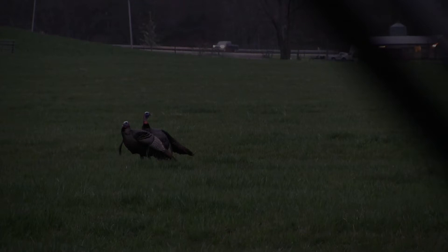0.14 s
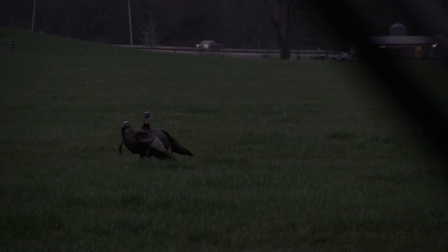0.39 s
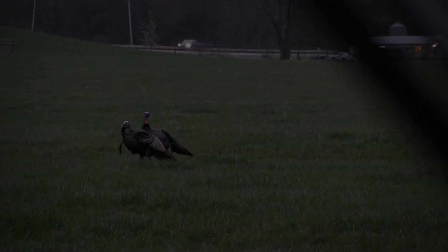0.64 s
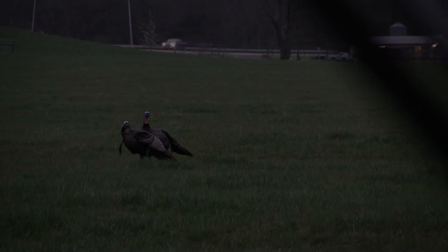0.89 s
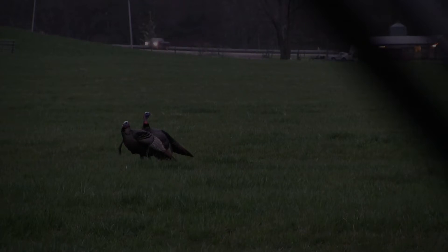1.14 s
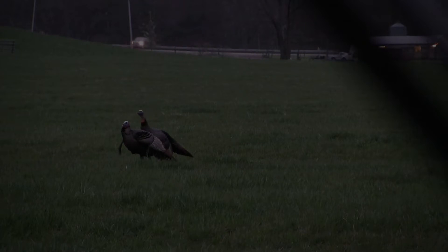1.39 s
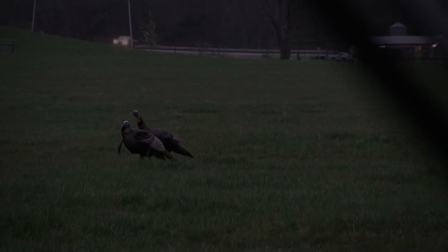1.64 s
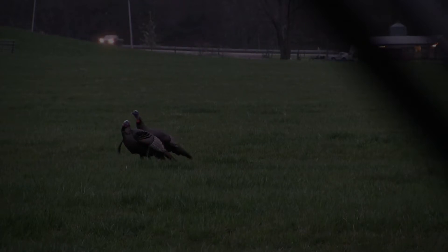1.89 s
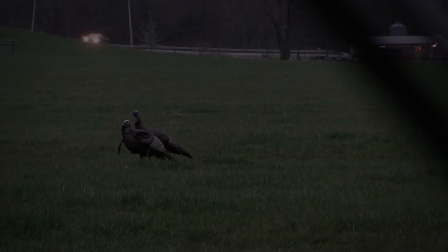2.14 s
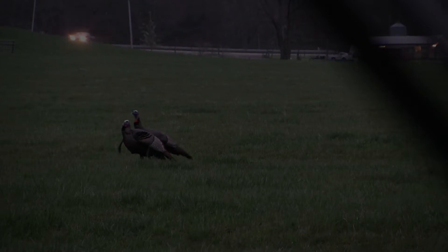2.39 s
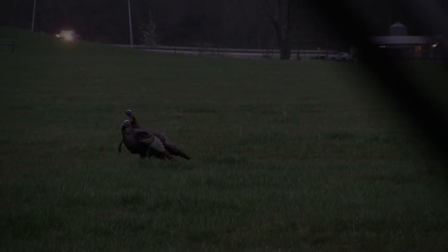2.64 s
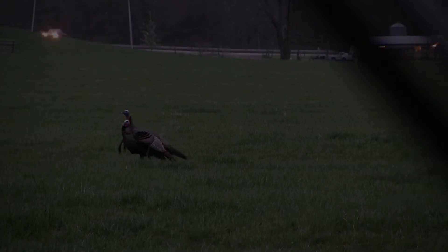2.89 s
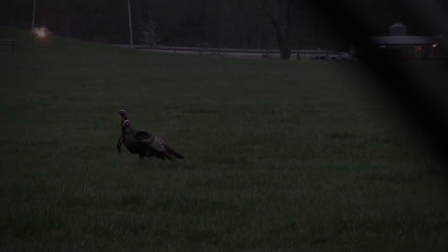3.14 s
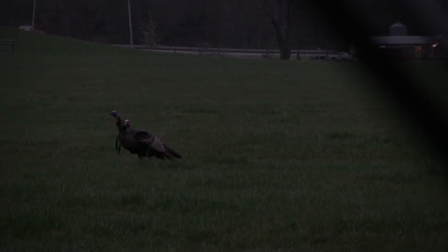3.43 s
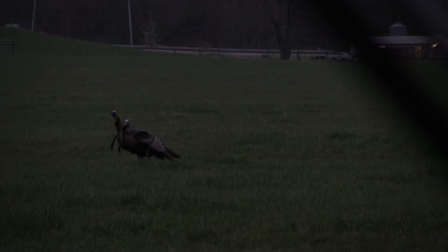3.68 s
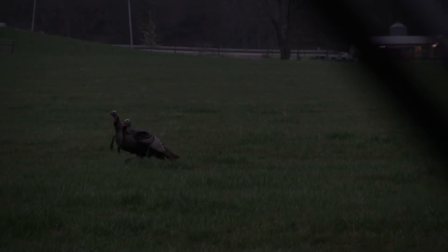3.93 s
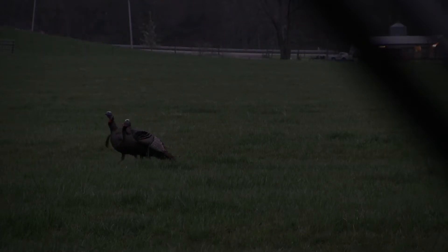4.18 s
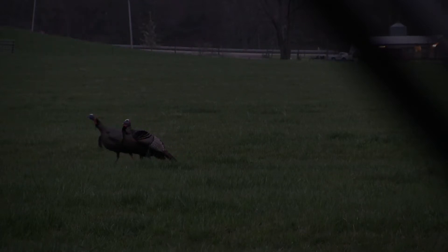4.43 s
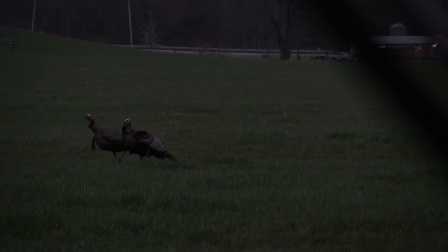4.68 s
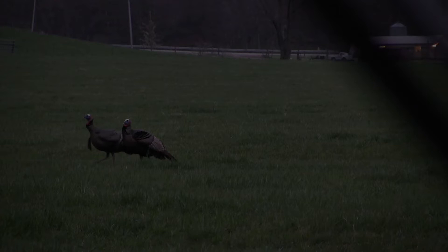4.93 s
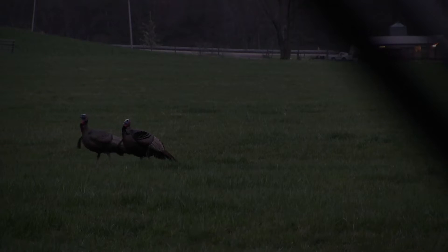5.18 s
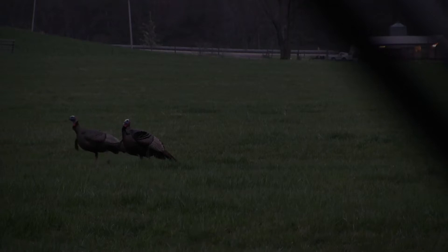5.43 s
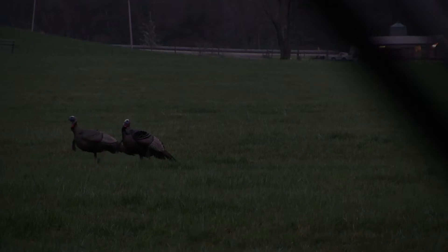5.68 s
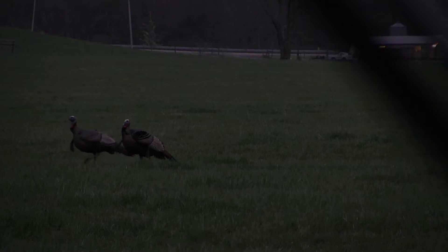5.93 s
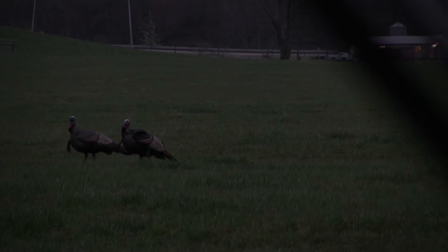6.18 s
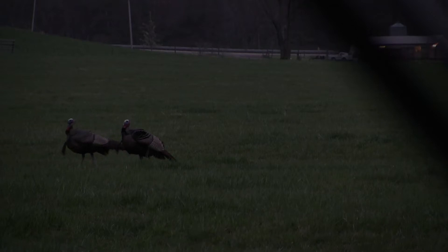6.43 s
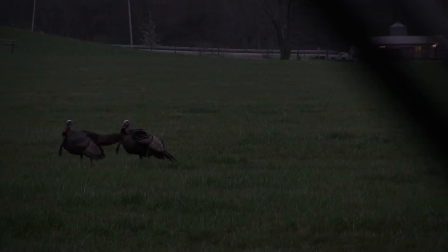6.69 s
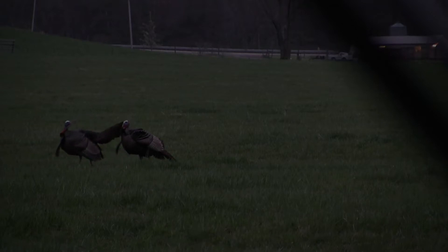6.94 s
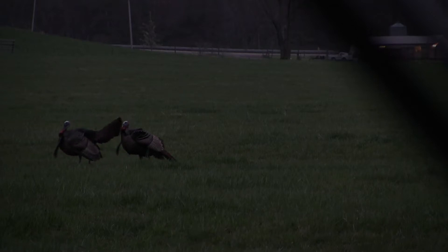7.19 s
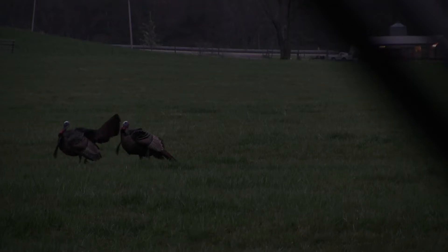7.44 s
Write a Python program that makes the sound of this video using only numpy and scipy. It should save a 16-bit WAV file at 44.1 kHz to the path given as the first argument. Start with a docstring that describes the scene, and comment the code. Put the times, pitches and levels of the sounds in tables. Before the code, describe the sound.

Quiet outdoor field at dusk. From 0 s a far road gives a soft low rumble and smooth tyre roar, swelling gently around 1.5 s, with very faint hiss. Small birds in the trees give thin falling whistles and hoarse chips, then a repeated quick phrase from 2.4 s. A faint touch of wood at 2.3 s precedes the first close yelp at 2.55 s. Yelps follow about every 0.3 s until 6.4 s, fourteen in all: abrupt, hollow, nasal and raspy, each under a tenth of a second, sagging slightly in pitch, with a dry tick before most. They grow stronger from 3.5 s, the last ones longest and roughest, briefly ducking the background. Only tight, short reflections follow. Afterwards ticks fall at 6.7 and 7.25 s, around a buzzy bird note at 6.7 s, a low rising blip at 7.2 s and bright chips, over traffic until 7.6 s.

```python
"""The edge of a wide field at dusk, with turkey yelps close to the microphone, made as on a wooden friction call:
a lid ticks down, then sticks and slips in pulses that ring a box, with short reflections close by.
Far off, road traffic is shaped noise: low rumble and tyre roar that swell and sink. Small birds in the trees
are gliding sines, chips of filtered noise and one buzzy note. A low blip rises once, perhaps a turkey's putt.
A limiter ducks everything under loud peaks."""
import sys
import numpy as np
from scipy import signal
from scipy.io import wavfile
from scipy.ndimage import uniform_filter1d, minimum_filter1d

SR = 44100
rng = np.random.default_rng(int(sys.argv[2]) if len(sys.argv) > 2 else 0)


def transcribe(u):
    """Save the signal u as a 16-bit wav file named by the first command-line argument.

    u: samples, shape (n,) or (channels, n), limited to [-1, 1]; the rate is SR.
    q: integer samples, one column per channel.
    """
    v = np.clip(np.atleast_2d(u).T, -1, 1)
    q = np.round(v * 32767).astype(np.int16)
    wavfile.write(sys.argv[1], SR, q)


def linear_from_db(decibels):
    """Turn decibels (scalar or array-like) into linear amplitude factors; 0 gives 1."""
    return 10 ** (np.asarray(decibels, float) / 20)


N = 334278  # samples


def evened(x):
    """Scales to rms 1."""
    return x / np.sqrt(np.mean(x ** 2) + 1e-20)


def read(points, hz):
    """Reads a spectrum on a log-frequency axis."""
    f, value = np.transpose(points)
    return np.interp(np.log(hz + 1), np.log(f + 1), value)


def add(mix, s, sound):
    """Mixes a sound in at time s."""
    part = mix[round(s * SR):][:len(sound)]
    part += sound[:len(part)]


def wander(count, smooth):
    """Smooth noise of rms 1, averaged twice over a window of so many samples."""
    once = uniform_filter1d(rng.standard_normal(count), smooth)
    return evened(uniform_filter1d(once, smooth))


def ringing(modes):
    """Impulse response of resonances, each applied twice for steep skirts."""
    t = np.arange(4096) / SR
    response = np.zeros(len(t))
    for hz, width_hz, db in modes:
        decay = np.pi * width_hz
        envelope = 2 * decay ** 2 * t / SR * np.exp(-decay * t)
        response += linear_from_db(db) * envelope * np.sin(2 * np.pi * hz * t)
    return response


def echoes(x, t60, start_s):
    """Sparse reflections of random sign that die away, energy 1."""
    taps = np.zeros(SR // 2)
    slots = np.arange(round(start_s * SR), len(taps) - 20, 20)
    taps[slots + rng.integers(0, 20, len(slots))] = rng.choice([-1., 1.], len(slots))
    taps *= linear_from_db(-60 * np.arange(len(taps)) / SR / t60)
    return signal.oaconvolve(x, taps / np.linalg.norm(taps))[:N]


def noise(spectrum, patchy_db, swell_db, size=1024):
    """Random short-time spectra with drifting patches, under a flutter shared by all bands; rms 1."""
    frames, hz = 4 * N // size + 5, np.fft.rfftfreq(size, 1 / SR)
    real, imaginary, patches = rng.standard_normal((frames, len(hz), 3)).T
    patches = uniform_filter1d(patches, size=10, axis=0)  # across frequency
    patches = evened(uniform_filter1d(patches, size=12288 // size, axis=1))  # across time
    z = (real + 1j * imaginary) * linear_from_db(read(spectrum, hz)[:, None] + patchy_db * patches)
    steady = signal.istft(z, nperseg=size, noverlap=3 * size // 4)[1][:N]
    return evened(steady * linear_from_db(swell_db * wander(count=N, smooth=2860)))


# Colour of the microphone's own hiss. Each row: frequency in Hz, relative density in dB per Hz.
HISS = [(3500, -10.5), (6000, -4), (9000, -0.5), (15600, -2.5), (16000, -34)]


def microphone_hiss():
    """Faint, patchy noise of the microphone, strongest in the treble."""
    return linear_from_db(-66) * noise(HISS, patchy_db=3.0, swell_db=1.4)


# Colour of the far engines' rumble. Each row: frequency in Hz, relative density in dB per Hz.
RUMBLE = [(8.8, -17.5), (15, -4.5), (38, -3), (101, 2.5), (159, -3.5), (210, -17.5), (500, -25), (650, -63),
          (1100, -120)]
# Colour of the tyres on the far road. Each row: frequency in Hz, relative density in dB per Hz.
ROAD = [(120, -43.5), (200, 0.5), (299, -12.5), (667, -12), (815, -5), (1560, -15.5), (2150, -18),
        (2840, -23), (3370, -21), (4810, -33), (8000, -38.5), (10400, -81), (17600, -120)]
# How the far traffic swells. Each row: time in seconds, rumble rms in dB, tyre roar rms in dB.
TRAFFIC = [(0, -34, -47), (.5, -36.5, -46), (1.5, -31, -42), (2.5, -35.5, -44.5), (4.4, -35, -45),
           (5.6, -34, -43.5), (6.5, -30.5, -43.5), (7, -38.5, -43.5), (7.58, -30.5, -42)]


def traffic():
    """Lumpy engine rumble and smooth tyre roar from the far road, each a noise with a moving level."""
    s, rumble_db, roar_db = np.transpose(TRAFFIC)
    t = np.arange(N) / SR
    rumble = linear_from_db(np.interp(t, s, rumble_db)) * noise(RUMBLE, patchy_db=1.2, swell_db=2.6, size=4096)
    roar = linear_from_db(np.interp(t, s, roar_db)) * noise(ROAD, patchy_db=.8, swell_db=.3)
    return rumble + roar


def far_chorus():
    """Rows of whistled notes, laid out as in WHISTLES, for farther birds at random."""
    when, long, pitch, glide, loud = rng.random((30, 5)).T
    start_hz = 2050 + (3800 - 2050) * pitch
    end_hz = start_hz * (1.03 - .1 * glide)
    return list(zip(when * N / SR, .03 + .1 * long ** 2, start_hz, end_hz, -64 + 6 * (loud - .5)))


# Single whistled notes in the trees, and one low rising blip, perhaps a turkey's putt.
# Each row: start in seconds, length in seconds, start pitch in Hz, end pitch in Hz, rms in dB.
WHISTLES = [(.47, .28, 3450, 2450, -58.5), (.84, .19, 3800, 3230, -58), (.86, .26, 2250, 2100, -62),
            (1.52, .18, 2250, 2150, -61), (1.3, .03, 2750, 2300, -54), (2.08, .06, 3700, 3250, -58),
            (3.19, .04, 2480, 2520, -52), (3.3, .04, 2500, 2650, -55), (3.35, .13, 3750, 3720, -54),
            (3.36, .12, 3300, 3320, -55), (3.75, .06, 2750, 2680, -52), (4.0, .03, 1820, 1880, -50),
            (4.03, .025, 2250, 2300, -50), (4.07, .03, 2700, 2700, -53), (4.385, .04, 3280, 3380, -54),
            (4.67, .03, 2520, 2500, -52), (4.73, .11, 3600, 3740, -46), (4.96, .09, 3250, 3350, -56),
            (5.06, .07, 3100, 2600, -52), (5.26, .04, 2450, 2400, -52), (5.32, .04, 2300, 2200, -51),
            (5.655, .08, 2850, 2530, -48), (6.645, .1, 5120, 5100, -58), (7.224, .018, 760, 1300, -38),
            (7.355, .025, 4800, 4550, -46), (7.39, .07, 2900, 2880, -54)]
# Notes of the phrase one bird repeats. Each row: delay into the phrase in seconds, length in seconds,
# start pitch in Hz, end pitch in Hz, level in dB relative to the phrase.
PHRASE = [(0, 0.032, 3800, 3760, -6), (.03, .035, 3360, 3235, 1), (.22, .03, 2600, 2880, -3.5),
          (.245, 0.06, 2875, 2700, -0.5)]
# When that bird sings its phrase. Each row: start in seconds, level in dB.
PHRASES = [(2.44, -50.5), (2.8, -48.5), (3.15, -48)]


def whistles(mix):
    """Near-sine notes, and the low blip, that glide early and waver slightly in pitch, near and far."""
    phrases = [(s + after, length, start_hz, end_hz, db + note_db)
               for s, db in PHRASES for after, length, start_hz, end_hz, note_db in PHRASE]
    for s, length, start_hz, end_hz, db in WHISTLES + phrases + far_chorus():
        u = np.linspace(0, 1, round(length * SR))
        glide_hz = end_hz + (start_hz - end_hz) * (1 - u) ** 1.3
        hz = glide_hz * (1 + 0.01 * wander(count=13000, smooth=96)[:len(u)])
        tone = np.sqrt(2) * np.sin(2 * np.pi * np.cumsum(hz) / SR)
        add(mix, s, linear_from_db(db) * tone * signal.windows.tukey(len(u), .5))


# Hoarse chips. Each row: start in seconds, centre frequency in Hz, rms in dB.
CHIPS = [(.179, 5360, -55.5), (.274, 5250, -55.5), (.283, 4400, -56), (.378, 4500, -54), (.385, 3800, -55),
         (.924, 5330, -61), (.93, 6200, -63.5), (1.599, 5270, -60), (1.603, 6140, -60.5),
         (7.352, 4730, -51)]


def chips(mix):
    """Short puffs of noise through one resonance, its width 12 % of the centre."""
    for s, hz, db in CHIPS:
        puff = rng.standard_normal(900) * signal.windows.tukey(900, .4)
        add(mix, s, linear_from_db(db) * evened(np.convolve(puff, ringing([(hz, 0.12 * hz, 0)])[:400])))


# The buzzy note. Each row: start in seconds, length in seconds, settled pitch in Hz,
# opening level of the middle tone in dB.
BUZZES = [(6.71, .24, 3975, -48)]


def buzzy_note(mix):
    """A wavering tone that starts 3 % sharp, with side tones from a beating level."""
    s, length, hz, db = BUZZES[0]
    t = np.arange(0, length, 1 / SR)
    beat = 1 + 1.5 * np.cos(2 * np.pi * 289 * t)  # a second membrane adds side tones
    shape = np.clip(np.minimum(t, length - t) / 0.021, 0, 1) ** 2 * linear_from_db(db - 9.5 * t / length)
    pitch = 1 + .03 * np.exp(-t / 0.031) + 0.0061 * wander(count=13000, smooth=300)[:len(t)]
    add(mix, s, np.sqrt(2) * shape * beat * np.sin(2 * np.pi * hz * np.cumsum(pitch) / SR))


def birds():
    """Whistles, chips and the buzzy note, wet with echoes from the trees."""
    mix = np.zeros(N)
    whistles(mix)
    chips(mix)
    buzzy_note(mix)
    return mix + linear_from_db(-7) * echoes(mix, t60=.3, start_s=.01)


# Colour of the lid's tick. Each row: frequency in Hz, relative level in dB.
TICK_COLOUR = [(200, 12), (1000, 13.5), (2800, 2), (4500, -9), (9000, -14.5), (11000, -47)]
# The lid touches down. Each row: time in seconds, click peak in dB, level of the low knock in dB.
TICKS = [(2.3072, -46, -22), (2.8582, -29.5, -26), (3.1666, -23.5, -25.5), (3.492, -34, -16),
         (3.8038, -23, -24), (4.1394, -23, -17), (4.4803, -25.5, -11), (4.786, -16.5, -31),
         (5.0816, -20.5, -21.5), (5.3785, -20.5, -19), (5.6451, -20.5, -24.5), (5.92, -14.5, -28),
         (6.2855, -18.5, -30), (6.716, -26, -26), (7.2453, -20.5, -44)]


def lid_ticks():
    """A minimum-phase click and a knock of two decaying sines at each touch, with close reflections."""
    ticks = np.zeros(N)
    hz = np.linspace(0, SR / 2, 129)
    # minimum_phase halves the dB, so they are doubled here
    click = signal.minimum_phase(signal.firwin2(257, np.linspace(0, 1, 129), linear_from_db(2 * read(TICK_COLOUR, hz))))
    t = np.arange(1500) / SR
    knock = np.sin(2 * np.pi * 480 * t) * linear_from_db(-60 * t / 0.0058)
    knock += .5 * np.sin(2 * np.pi * 800 * t) * linear_from_db(-60 * t / 0.023)
    for s, click_db, knock_db in TICKS:
        add(ticks, s, linear_from_db(click_db) * click / abs(click).max())
        add(ticks, s, linear_from_db(knock_db) * knock)
    return ticks + linear_from_db(-3.0) * echoes(ticks, t60=0.056, start_s=.001)


# Strokes of the lid. Each row: start in seconds, length in seconds, force in dB, slips a second in Hz
# before the pitch moves, grit in dB over the mean slip force at the start.
YELPS = [(2.548, 0.053, 1.5, 689.5, 15), (2.902, .061, 1, 700, 9), (3.223, 0.01, 1.5, 668.3, 18),
         (3.235, .029, 2, 697.5, 13), (3.518, 0.058, 6, 682, 11), (3.830, 0.059, 10, 678.6, 13.5),
         (4.158, 0.064, 7, 694, 11.5), (4.52, 0.052, 5, 709.5, 14.5), (4.838, 0.05, 7.5, 704.7, 16.5),
         (5.127, .041, 3.5, 683.4, 13), (5.431, 0.042, 10.5, 704, 14), (5.729, 0.068, 11.5, 706.4, 15),
         (6.025, .078, 11, 722, 18), (6.336, 0.082, 9, 702, 17.5)]
# The clearest moments where the tone drops out, in seconds; rough strokes lose step at random besides.
STUMBLES = [2.578, 2.935, 2.936, 3.244, 3.554, 3.852, 3.877, 4.179, 4.198, 4.552, 4.87, 4.88, 5.15, 5.463,
            5.76]
LEAD_S = .02  # time kept before each bite for the faint scrape


def slip_pulses(t, s, length, hz, rough, warm):
    """Stick-slip pulses: the rougher, the more they waver in time and size."""
    along = np.clip(t / length, 0, 1)
    settling = np.exp(-np.maximum(t, 0) / 0.0046)  # a light lid slips fast and unevenly
    rate = hz * (1 - 0.056 * along - 0.054 * along ** 4 + .25 * warm * settling)  # slows towards the end
    rate *= 1 + .3 * (rough + .04 + 0.16 * settling) * wander(count=len(t), smooth=73)
    lost = np.cumsum(rng.random(len(t)) < (20 + 200 * rough ** 2) / SR)
    lost = lost + np.searchsorted(STUMBLES, s + t + .0015)  # steps 1.5 ms ahead of the listed time
    # losing a quarter turn cancels the main mode for a moment
    turns = np.cumsum(rate) / SR - uniform_filter1d(lost / 4, size=40) + rng.random()
    halves = np.floor(2 * turns)
    second = .73 * warm * (1 - settling)  # once settled, the main mode drags a second slip into each turn
    size = np.where(halves % 2, second, 1) / (1 + second)
    size *= 1 + 0.31 * rough * rng.standard_normal(len(t))
    slips = (np.diff(halves, prepend=halves[0]) > 0) * size
    moment = np.hanning(16) / np.hanning(16).sum()  # each slip lasts a moment
    return np.convolve(slips, moment)[:len(t)] * SR / hz


def scraping_grit(t, along, grit_db):
    """Treble-rich noise of uneven level that dips at the bite and swells after it, thinning by 3.5 dB."""
    lowpass = signal.butter(8, 9600, fs=SR, output="sos")
    grains = evened(signal.sosfilt(lowpass, np.diff(rng.standard_normal(len(t) + 1))))
    level = linear_from_db(grit_db - 3.5 * along + 3.54 * wander(count=len(t), smooth=110))
    return level * grains * (1 - .8 * np.exp(-abs(t) / .01))


def lid_pressure(t, length, along, force_db, rough_start, warm):
    """The lid scrapes faintly, bites, leans in, eases by 4 dB and lifts."""
    # the scrape is louder once warm; rough strokes grab at once, with little scrape before
    lead_db = -38 + 11.5 * warm - 17.5 * rough_start - force_db
    lead = linear_from_db(lead_db + 499.5 * np.minimum(t, 0)) * (t < length)  # climbs 499.5 dB a second to the bite
    leaning = np.clip(1 - t / .015, 0, 1)
    rise = np.clip(t / 0.00048, 0, 1) * linear_from_db((-10.5 - 9 * warm) * leaning)  # a gentler bite once warm
    lift = np.clip((length - t) / 0.0094, 0, 1)
    return linear_from_db(force_db) * (lead + rise * lift * linear_from_db(-4 * along))


def stroke(s, length, force_db, hz, grit_db, rough_start, rough_end):
    """One stroke of the lid: slip pulses and grit, both scaled by the pressure on the box."""
    t = np.arange(5500) / SR - LEAD_S
    warm = min(s - YELPS[0][0], 1)  # the lid warms up over one second from the first stroke
    along = np.clip(t / length, 0, 1)
    rough = rough_start + (rough_end - rough_start) * along
    friction = slip_pulses(t, s, length, hz, rough, warm) + scraping_grit(t, along, grit_db)
    return lid_pressure(t, length, along, force_db, rough_start, warm) * friction


# What the box rings with. Each row: frequency in Hz, width of a single pass in Hz, gain in dB.
BOX = [(671.5, 120, -10), (875, 103, -1.5), (1124, 120, 6), (1360, 205, 6), (1595, 79, 1),
       (1766, 147, -3.5), (2030, 180, -11.5), (2446, 500, -32.5), (2860, 940, -23), (3416, 450, -27),
       (4080, 160, -24.5), (5140, 1900, -54), (7140, 150, -60), (8700, 520, -51.5), (8770, 270, -63.5)]
# One row a stroke. Each row: roughness at the start from 0 to 1, roughness at the end from 0 to 1.
GRIP = [(.04, .1), (.25, .08), (.8, .8), (.15, .05), (.05, .5), (.1, .4), (.2, .2), (.04, .12), (.06, .15),
        (.2, .2), (.06, .06), (.5, .12), (.7, .9), (.5, .8)]


def yelps():
    """Strokes drive the ringing box, close to the microphone, with near reflections."""
    drive = np.zeros(N)
    for row, grip in zip(YELPS, GRIP):
        add(drive, row[0] - LEAD_S, stroke(*row, *grip))
    direct = signal.oaconvolve(drive, ringing(BOX))[:N]
    # the upper middle range echoes longest
    upper = signal.oaconvolve(direct, ringing([(3470, 1600, 0.0029)]))[:N]
    near = linear_from_db(-10.5) * echoes(direct, t60=0.08, start_s=.004)
    near += linear_from_db(-8.0) * echoes(upper, t60=0.14, start_s=.003)
    return direct + near


def scene():
    """All sources at one microphone, with its own hiss."""
    return (microphone_hiss() + traffic() + birds() + lid_ticks() + yelps())[None]


def limiter(dry):
    """Clamps peaks over -1.3 dB at once, holds about 17 ms and recovers at 150 dB a second."""
    over_db = 20 * np.log10(abs(dry[0]) + 1e-9) + 1.3
    recovered_db = np.arange(N) * 150. / SR
    held_db = -minimum_filter1d(-over_db, size=801, origin=350)  # looks 50 samples ahead, 750 back
    duck_db = np.maximum(np.maximum.accumulate(held_db + recovered_db) - recovered_db, 0)
    return dry / linear_from_db(uniform_filter1d(duck_db, size=91))


def top_cut(x):
    """Nothing passes above the cut-off."""
    return signal.sosfilt(signal.butter(12, 15800, fs=SR, output="sos"), x)


def record(dry):
    """The microphone signal passes the limiter and is stored."""
    limited = limiter(dry)
    return top_cut(limited)


dry = scene()
out = record(dry)
transcribe(out)
```